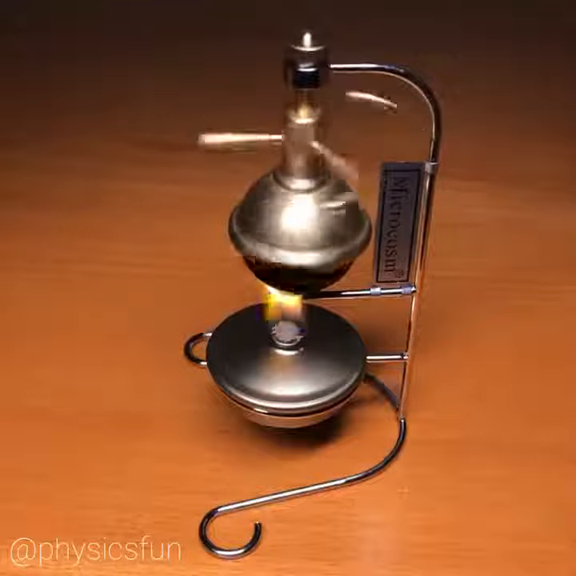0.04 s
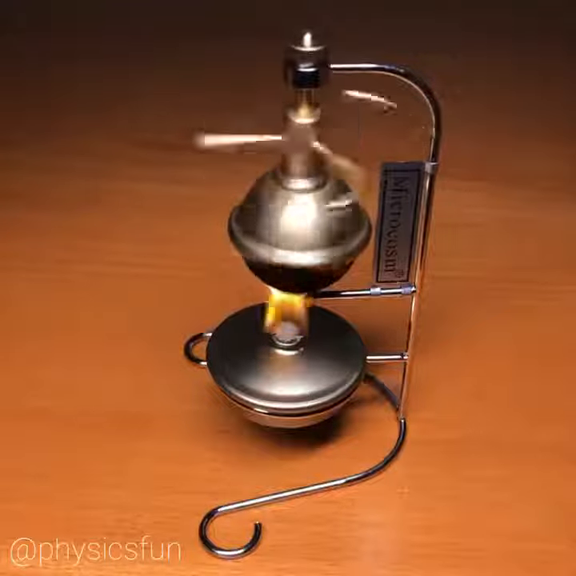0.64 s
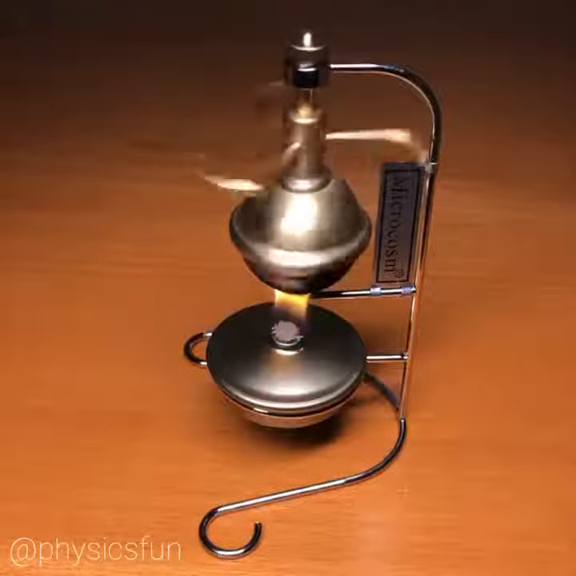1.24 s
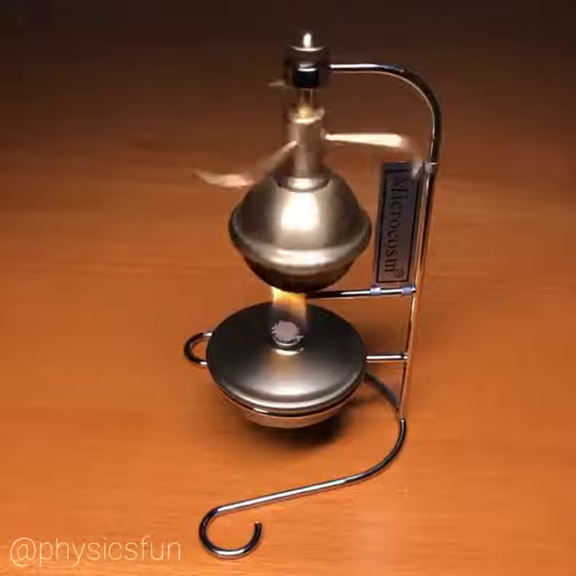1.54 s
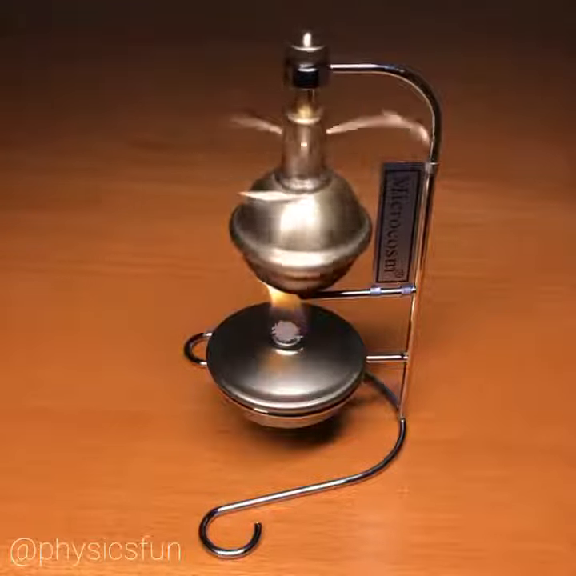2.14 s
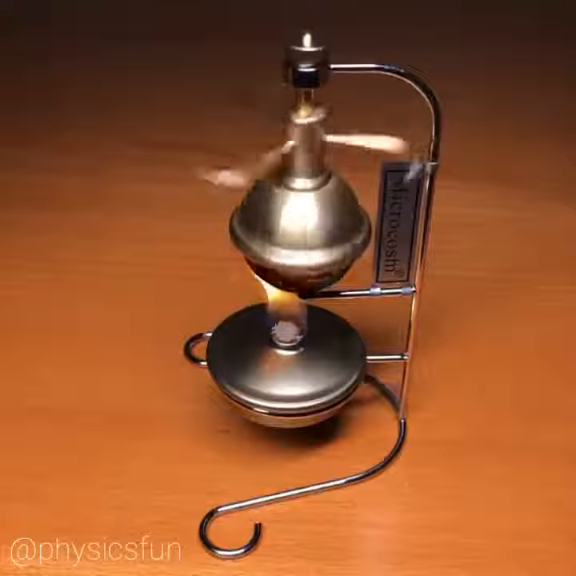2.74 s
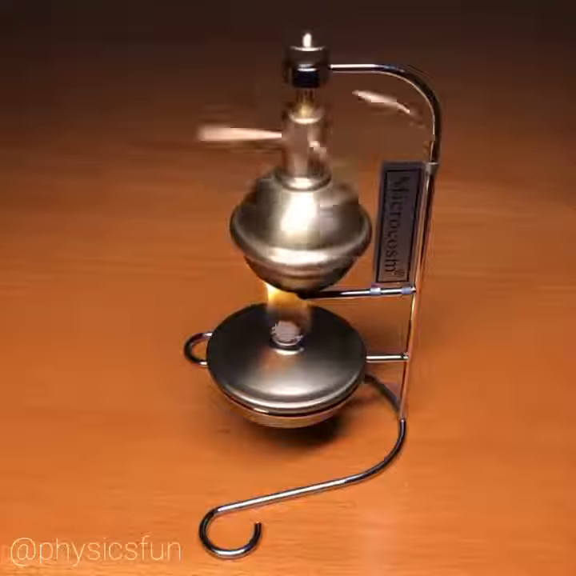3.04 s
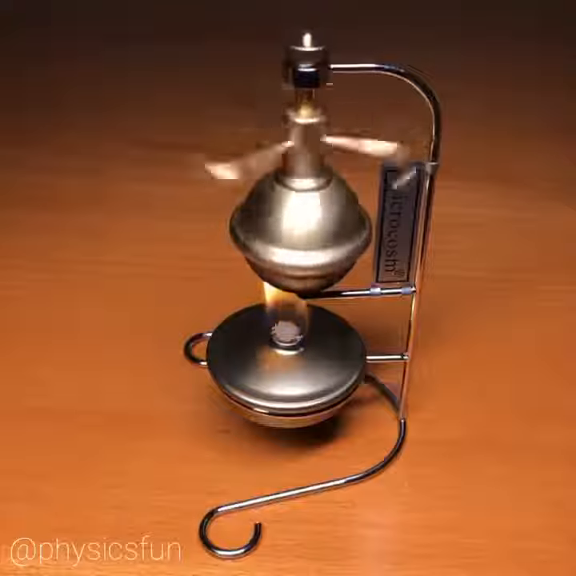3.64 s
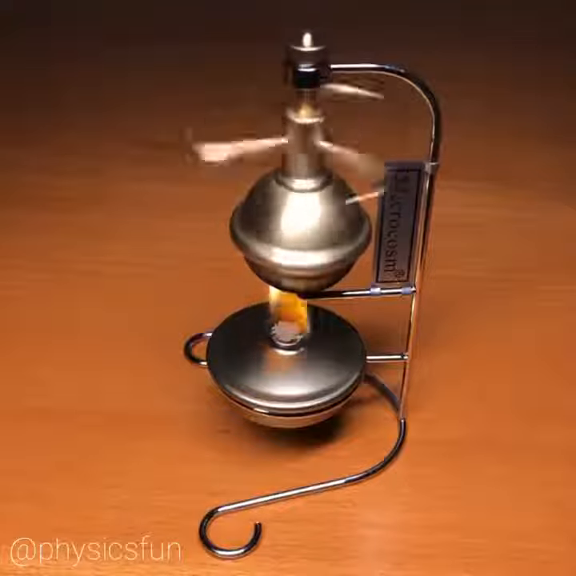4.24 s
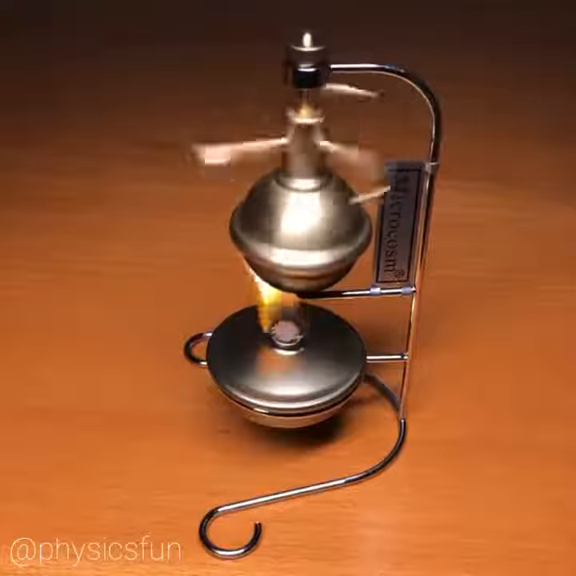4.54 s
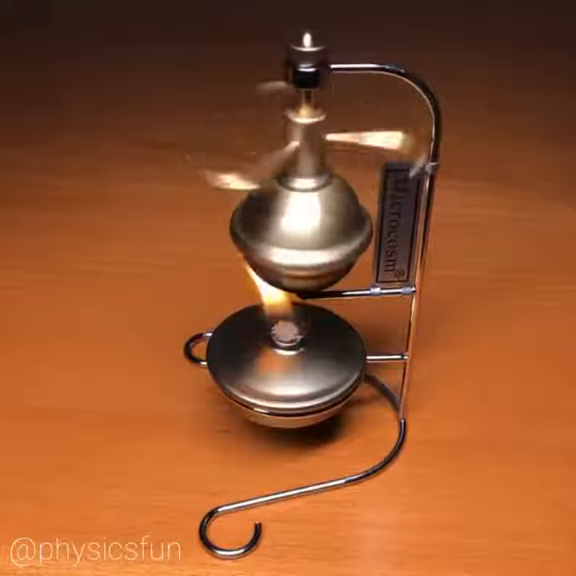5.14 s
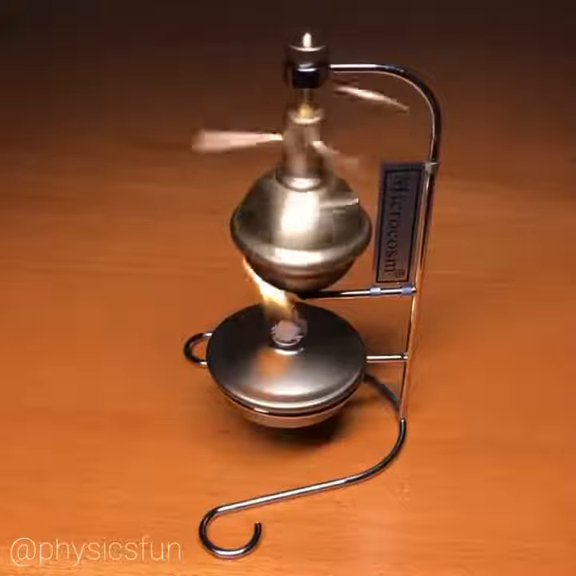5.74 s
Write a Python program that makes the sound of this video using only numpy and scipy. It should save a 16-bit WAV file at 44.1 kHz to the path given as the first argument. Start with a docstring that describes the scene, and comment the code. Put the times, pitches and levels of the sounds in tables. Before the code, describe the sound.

A small metal steam ball spins over a flame, its nozzles giving a continuous wet, sputtering hiss with a hollow, breathy half-whistle inside. A faint squeal and whoosh pass once per turn, coming faster as it speeds up. Water spits through twice, briefly dipping the pitch. Then the hiss flutters and thins while the note sinks. The microphone is close, in a quiet room with a faint rumble and hum.

```python
"""A wet, sputtering hiss with a hollow half-whistle in it: a small steam ball spinning ever faster over a
spirit flame, close up on a table in a quiet room. Steam leaves the nozzles as turbulence and bursting
droplets; the tubes colour it, their note sinking as the spray thins. Once a turn a jet sweeps past with
a faint squeal. Two slugs of water spit through, the flow flutters and falters, and the hot metal ticks
over a low rumble and mains hum."""
import sys
import numpy as np
from scipy import signal
from scipy.io import wavfile
from scipy.ndimage import uniform_filter1d, map_coordinates

SR = 44100
rng = np.random.default_rng(int(sys.argv[2]) if len(sys.argv) > 2 else 0)


def unload_audio(sound):
    """Save the sound as a 16-bit wav file, at the path given as the first command line argument."""
    columns = np.transpose(np.atleast_2d(sound))
    # keep every value between -1 and 1, then stretch to whole-number steps
    steps = np.round(np.clip(columns, -1, 1) * 32767)
    wavfile.write(sys.argv[1], SR, steps.astype(np.int16))


N = 260190
TIME = np.arange(N) / SR


def nozzles():
    """The main voice: wet steam rings the tubes and sprays into the open; each slug makes it swell."""
    outer_steam = wet_steam(droplets_per_s=2000, scatter_db=.5, turbulence_db=1.5)
    inner_steam = wet_steam(droplets_per_s=3000, scatter_db=2.5, turbulence_db=1)
    pitch = tube_pitch()
    note = tube_note(inner_steam, pitch) * undb(.6 * slug_swell_db())
    overtones = tube_overtones(outer_steam + .65 * inner_steam, pitch) * undb(slug_swell_db(linger=1.8))
    hiss = spray(outer_steam) * undb(slug_swell_db())
    rush = jet_rush()
    spatter = slug_spatter()
    puffs = flutter()
    return puffs * (note + rush) + table_swirl(puffs * overtones + hiss) + spatter


def wet_steam(droplets_per_s, scatter_db, turbulence_db, sputter_db=.5):
    """Droplets burst as one-sided pressure spikes over jet turbulence; the flow sputters."""
    bursts = rng.random(N) < droplets_per_s / SR
    bursts = bursts * undb(scatter_db * np.clip(rng.standard_normal(N), -2, 2))
    jet = unit(bursts.mean() - bursts) + undb(turbulence_db) * rng.standard_normal(N)
    return jet * undb(sputter_db * walk(170))


# Fader rides of the steam, before each layer's trim: t/s, spray level/dB, hollow note level/dB
STEAM_FADERS = [(0, -52.5, -54), (.3, -53.5, -56), (.8, -53, -56.5), (1.45, -51.5, -59), (2.05, -52, -57.5),
                (3.0, -53.5, -57), (3.7, -55, -55.5), (4.4, -55.5, -54.5), (4.85, -57.5, -57),
                (5.6, -57, -55), (5.9, -59, -54)]
# EQ of the open spray: f/Hz, relative level/dB
SPRAY_EQ = [(900, -35), (1700, -27.5), (2500, -12.5), (3200, -11.5), (4200, -9), (5400, -2), (5800, -10.5),
            (6200, -9), (6650, -2), (7100, 0.5), (8500, 0), (9300, -3), (12200, -2), (14000, -8)]
def spray(steam, trim_db=1.33):
    """Steam in the open air: a bright, flickering hiss that ducks when the flow falters."""
    level_db = curve(STEAM_FADERS) + trim_db - falter_db()
    return colour(steam, SPRAY_EQ) * undb(level_db + .62 * walk(20) + .56 * walk(260))


def flow_db(full_flow_db=-51):
    """Strength of the flow relative to full flow."""
    return curve(STEAM_FADERS) - full_flow_db


# The tubes' tune: t/s, lowest resonance f/Hz, whistling core level/dB against the hollow note
TUBE_TUNE = [(0, 2664, -2), (.36, 2881, -5), (.5, 2695, -7), (.7, 2790, -2.5), (.9, 2722, -5),
             (1.55, 2748, -5.5), (1.68, 2741, 1), (1.85, 2740, -3), (2.12, 2710, -0.5), (2.5, 2620, -7),
             (3.3, 2731, -2), (3.8, 2619, -10), (4.3, 2560, -4.5), (4.62, 2583, -9), (4.8, 2422, -2),
             (5.13, 2367, -3), (5.4, 2292, -5), (5.52, 2484, -13), (5.9, 2437, -11)]
def tube_pitch(waver_octaves=.011):
    """Lowest resonance in Hz; water in the tubes makes it waver and a slug pulls it down."""
    return curve(TUBE_TUNE) * 2 ** (waver_octaves * walk(18) - slug_drop_octaves())


# EQ of the hollow note, tracking the pitch: multiple of the lowest resonance, relative level/dB
HOLLOW_EQ = [(.42, -33), (.6, -25.5), (.7, -16.5), (.8, -6.5), (.9, -1), (.99, -2.5), (1.06, -2.5),
             (1.15, -7.5), (1.5, -19), (3, -44)]
def tube_note(steam, pitch, trim_db=-1.36):
    """Steam rings the tubes' lowest resonance: a breathy, hollow note with a whistling core."""
    core = whistle(pitch, width_hz=140) * undb(curve(TUBE_TUNE, column=2))
    level_db = curve(STEAM_FADERS, column=2) + trim_db + .25 * walk(12)
    return (colour(steam, HOLLOW_EQ, pitch) + core) * undb(level_db)


# EQ of the overtones, tracking the pitch: multiple of the lowest resonance, relative level/dB
OVERTONE_EQ = [(.6, -30.5), (.95, -6), (1.15, -5.5), (1.28, -6.5), (1.55, -7.5), (1.72, -3), (1.93, -0.5),
               (2.03, -3), (2.17, -4.5), (2.7, -12), (5, -43)]
def tube_overtones(steam, pitch):
    """The tubes' upper resonances, ducked by falters, and a faint octave that water makes ring out."""
    level_db = -57.2 - .61 * falter_db() + .91 * walk(16) + .5 * walk(220)
    overtones = colour(steam, OVERTONE_EQ, pitch) * undb(level_db)
    octave = whistle(2 * pitch, width_hz=280) * undb(-63.5 + 8 * slug_drop_octaves())
    return overtones + octave


# Slugs of water: t/s, clearing time/s, pitch drop/octaves, swell/dB, squeal send/dB, spatter level/dB
WATER_SLUGS = [(1.616, 0.09, 0.42, 3.5, -53, -66.5), (2.771, 0.038, 0.2, 4.5, -63, -70)]
def slug_drop_octaves(film_share=.3, film_linger=2.4):
    """A slug deepens the tubes' pitch; the film it leaves holds part of the drop for longer."""
    return sum(octaves * ((1 - film_share) * gulp(at, clear) + film_share * gulp(at, film_linger * clear))
               for at, clear, octaves, *_ in WATER_SLUGS)


SLUG_SWELL_S = .018  # the hiss builds more slowly than the pitch drops
def slug_swell_db(linger=1):
    """The steam surges with each slug; linger stretches the release."""
    return sum(db * gulp(at, linger * clear, SLUG_SWELL_S) for at, clear, _, db, *_ in WATER_SLUGS)


def slug_spatter():
    """Each slug spits out a short splash of midrange noise."""
    envelope = sum(undb(db) * gulp(at, clear) ** 2 for at, clear, *_, db in WATER_SLUGS)
    return ring(1560, width_hz=1300) * envelope


def gulp(at, clear_s, attack_s=.00501):
    """Envelope of a slug: fast attack, short hold, smooth release."""
    age = np.maximum(TIME - at, 0)
    return (1 - np.exp(-age / attack_s)) * np.exp(-(age / clear_s) ** 2)


# Tremolo of the flow: t/s, swing either way/dB
FLUTTER_DEPTH = [(0, 0.5), (1.1, 2), (1.7, 0.5), (2.4, 1.6), (3.05, 2.5), (3.6, 2), (4.1, 1.5), (5.9, 1)]
def flutter(rate_hz=100, scatter_octaves=.5):
    """Gain of the flow as water chops it into quick, uneven puffs; rms 1."""
    rate = rate_hz * 2 ** (scatter_octaves * walk(140))
    gain = undb(curve(FLUTTER_DEPTH) * np.sin(2 * np.pi * np.cumsum(rate) / SR))
    return gain / np.sqrt(np.mean(gain ** 2))


# Dips in the flow: t/s, half length/s, depth in the spray/dB
FLOW_DIPS = [(1.25, 0.034, 2), (2.563, 0.068, 1), (2.93, 0.065, 0.2), (4.798, 0.04, 0.5), (5.09, 0.05, 0.5),
             (5.323, 0.082, 2.5), (5.69, 0.028, 2.5)]
def falter_db():
    """The flow falters in brief, flat-bottomed dips."""
    return sum(db * np.exp(-.5 * ((TIME - at) / half) ** 6) for at, half, db in FLOW_DIPS)


# Modes of the metal ball: f/Hz, width/Hz, level/dB against the steam that drives them
BALL_MODES = [(1625, 18, -8.5), (2126, 26, -5.5), (2440, 14, -13), (3350, 30, -14.5), (4400, 50, -13),
              (6550, 65, -6.5), (6930, 80, -15.5), (9420, 180, -12)]
def ball(steam):
    """The steam sets the thin metal ball ringing."""
    return steam + sum(undb(db) * resonate(steam, hz, width) for hz, width, db in BALL_MODES)


# Spin-up of the ball: t/s, speed/(turns per s)
SPIN_SPEED = [(0, 1.42), (2.6, 2.735), (4.3, 3.39), (5.9, 3.5)]
def turns(facing_s=3.06):
    """Turns of the ball, whole whenever the squealing jet faces the microphone."""
    count = np.cumsum(curve(SPIN_SPEED)) / SR
    return count - np.interp(facing_s, TIME, count)


def turned_away(lag_turns=0):
    """Angle of the jet from the microphone, in turns from -.5 to .5."""
    return (turns() - lag_turns + .5) % 1 - .5


def sweep(half_turns, lag_turns=0):
    """Pass-by envelope: rises to 1 once a turn as the jet comes round."""
    return np.exp(-.5 * (turned_away(lag_turns) / half_turns) ** 2)


def jet_rush(swing_db=8):
    """The jet's lower whoosh, a thin whistle wandering inside; it peaks just after the squeal."""
    core = whistle(3450 * 2 ** (.07 * walk(12)), width_hz=150) * undb(-7)
    whoosh = whistle(3280 * 2 ** (.05 * walk(14)), width_hz=1200)
    level_db = -57 + .54 * flow_db() - 5.4 * falter_db()  # all but dies in a deep falter
    off_axis_db = swing_db * (1 - sweep(half_turns=.26, lag_turns=.086))
    return unit(whoosh + core) * undb(level_db - off_axis_db)


# Fader ride of the passing squeal: t/s, send level/dB
SQUEAL_FADER = [(.5, -59), (2.3, -59), (2.7, -57), (3.4, -59), (4.03, -58.5), (4.32, -59), (4.62, -57.5),
                (4.9, -68), (5.21, -60), (5.48, -66), (5.8, -65)]
def squeals(pitch_hz=6600, rise_octaves_per_turn=.15):
    """The jet half locks into a whistle at the nozzle lip, heard once a turn and behind each slug."""
    pitch = pitch_hz * 2 ** (.006 * flow_db() + .00401 * walk(30))  # sinks a little with the flow
    bend = 2 ** (rise_octaves_per_turn * turned_away())
    core = whistle(pitch, width_hz=210) * undb(-6.5)
    swish = whistle(pitch * bend, width_hz=1060) * undb(1)
    passes = sweep(half_turns=.078) * undb(curve(SQUEAL_FADER) + .7 * walk(25))
    spits = sum(undb(db) * gulp(at, clear, SLUG_SWELL_S) for at, clear, _, _, db, _ in WATER_SLUGS)
    return (core + swish) * (passes + spits)


# Cues for the hot metal: t/s, level/dB, f/Hz
METAL_TICKS = [(.976, -60.5, 1200), (3.216, -63, 650), (3.492, -63.5, 1100), (5.231, -63.5, 950)]
def ticks(decay_s=.003):
    """Hot metal gives small, dry ticks that die at once."""
    return sum(ring(hz, 2.1 * hz) * (TIME >= at) * np.exp(-abs(TIME - at) / decay_s) * undb(db)
               for at, db, hz in METAL_TICKS)


def table_swirl(x, lag_s=.0014, swing_s=.00025, mirror_db=-17):
    """A light flange: the table's reflection comes early and late by turns as the nozzles circle."""
    lag = lag_s + swing_s * np.sin(2 * np.pi * turns())
    return x + undb(mirror_db) * map_coordinates(x, [(TIME - lag) * SR], mode="mirror")


def early_reflections(x, echo_db=-21, decay_s=.015):
    """Stand, lamp and table scatter a little of the sound back within milliseconds."""
    age = TIME[:SR // 10]
    echoes = rng.standard_normal(len(age)) * np.exp(-age / decay_s) * (age > .001)
    return x + undb(echo_db) * signal.fftconvolve(x, echoes / np.linalg.norm(echoes))[:N]


# EQ of the room's rumble: f/Hz, relative level/dB
RUMBLE_EQ = [(12, -53), (20, -15), (48, -2), (65, 1.5), (92, -5), (124, -5.5), (183, -14.5), (468, -18),
             (723, -25.5), (1100, -29.5), (1430, -22), (2420, -120)]
# Partials of the mains hum: f/Hz, level/dB
MAINS_HUM = [(59.7, -75), (120, -85)]
def room_tone():
    """The bed: a low rumble, a thin even hiss of air and a wavering mains hum."""
    rumble = colour(rng.standard_normal(N), RUMBLE_EQ, size=8192) * undb(-72 + .48 * walk(6.1))
    air = ring(1160, width_hz=2500) * undb(-86)
    hum = sum(np.sqrt(2) * undb(db + 1.3 * walk(3.5)) * np.sin(2 * np.pi * hz * TIME + .3 * walk(2.1))
              for hz, db in MAINS_HUM)
    return rumble + air + hum


def undb(db):
    """Decibels to gain."""
    return 10 ** (np.asarray(db) / 20)


def unit(x):
    """Scale to rms 1."""
    return x / np.std(x)


def curve(table, column=1):
    """Automation lane: one column of a table, joined by straight lines in time."""
    rows = np.array(table)
    return np.interp(TIME, rows[:, 0], rows[:, column])


def walk(rate):
    """Smooth random modulation that changes about rate times a second; spread 1."""
    hold = max(int(SR / rate), 1)
    steps = rng.standard_normal(N)[np.arange(N) // hold]
    return unit(uniform_filter1d(steps, hold))


def colour(x, eq, scale=1, size=512):
    """Filter by an EQ curve whose frequency axis may stretch over time; rms 1."""
    hz, frame_s, frames = signal.stft(x, SR, nperseg=size)
    stretch = np.interp(frame_s, TIME, scale * np.ones(N))
    points, db = np.transpose(eq)
    gain_db = np.interp(np.log(hz[:, None] / stretch + 1e-6), np.log(points), db)
    return unit(signal.istft(frames * undb(gain_db), SR)[1][:N])


def resonate(x, hz, width_hz):
    """One resonance, gain 1 at its centre."""
    return signal.lfilter(*signal.iirpeak(hz, hz / width_hz, fs=SR), x)


def ring(hz, width_hz):
    """Noise held in one steep resonance; rms 1."""
    return unit(resonate(resonate(rng.standard_normal(N), hz, width_hz), hz, width_hz))


def whistle(hz, width_hz):
    """Noise held in a resonance whose pitch moves; rms 1."""
    centre = np.mean(hz)
    return map_coordinates(ring(centre, width_hz), [np.cumsum(hz / centre)], mode="mirror")


def scene():
    """The steam ball over room tone; one close microphone feeds both channels."""
    mono = early_reflections(ball(nozzles()) + squeals() + ticks()) + room_tone()
    return np.array([mono, mono])


def record(dry, top_hz=14050):
    """A steep low-pass cuts the top."""
    return signal.sosfilt(signal.ellip(12, .1, 70, top_hz, fs=SR, output="sos"), dry)


dry = scene()
out = record(dry)
unload_audio(out)
```